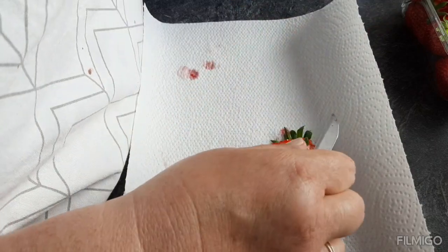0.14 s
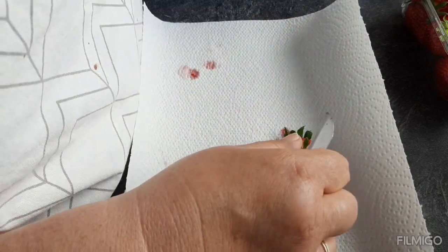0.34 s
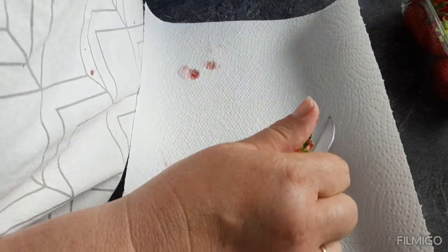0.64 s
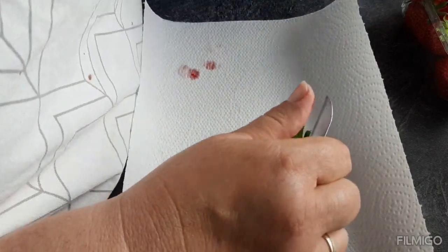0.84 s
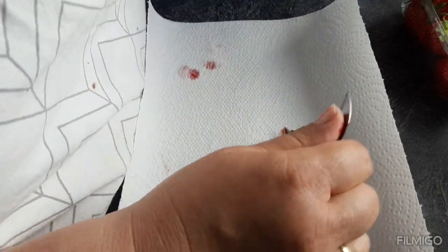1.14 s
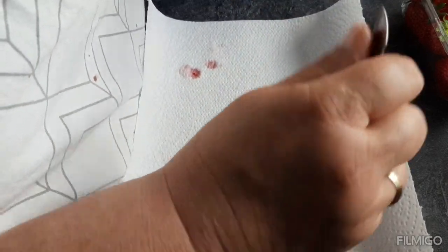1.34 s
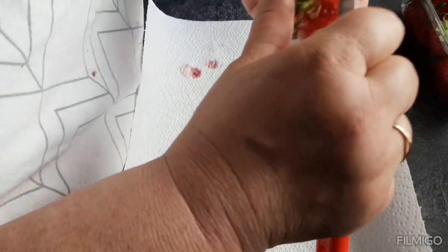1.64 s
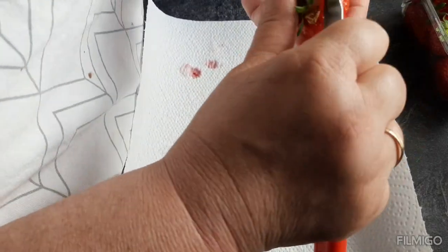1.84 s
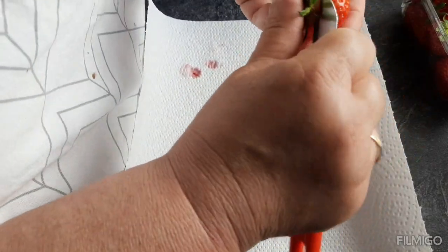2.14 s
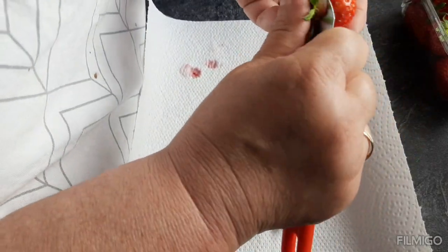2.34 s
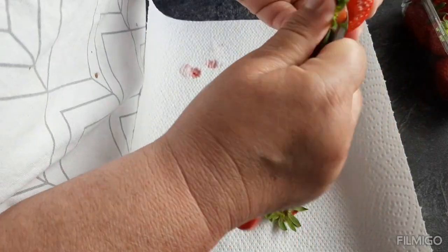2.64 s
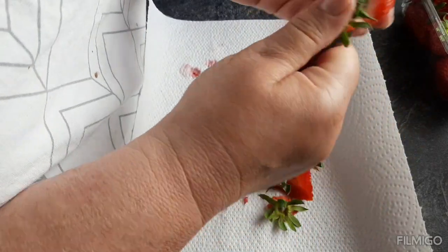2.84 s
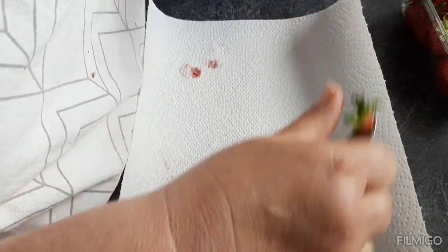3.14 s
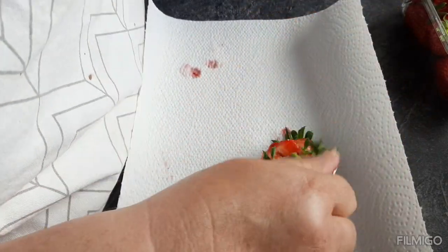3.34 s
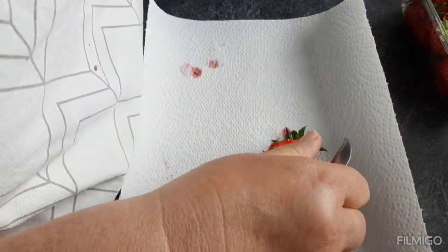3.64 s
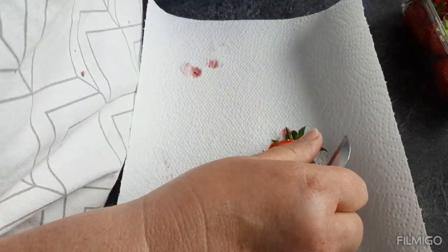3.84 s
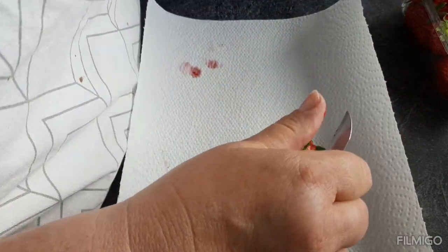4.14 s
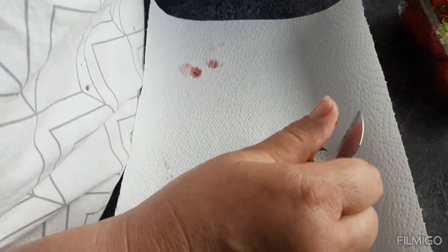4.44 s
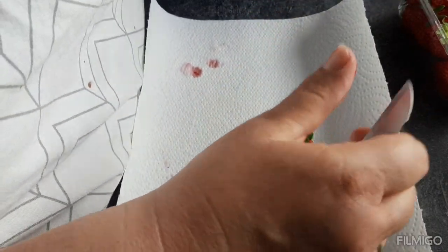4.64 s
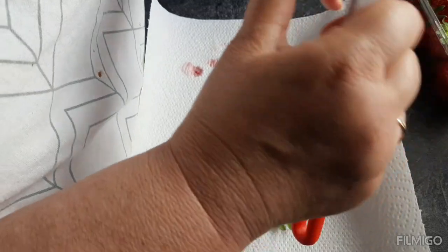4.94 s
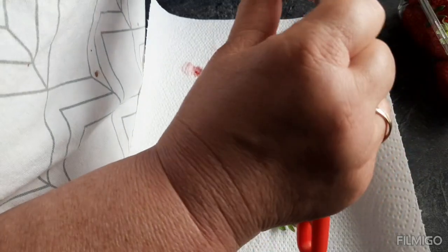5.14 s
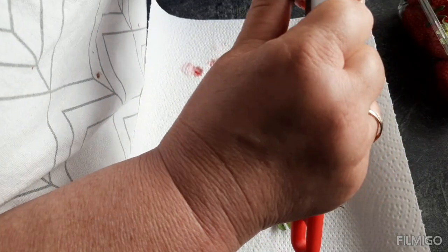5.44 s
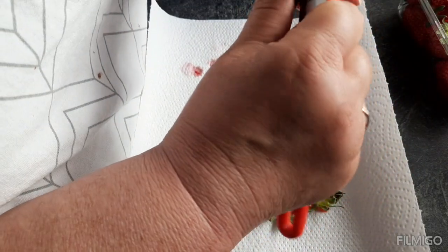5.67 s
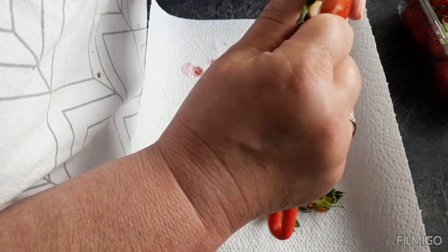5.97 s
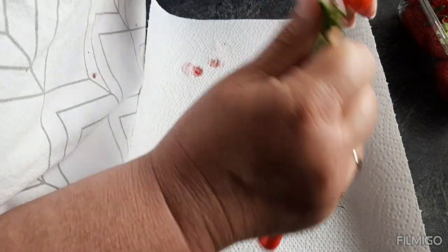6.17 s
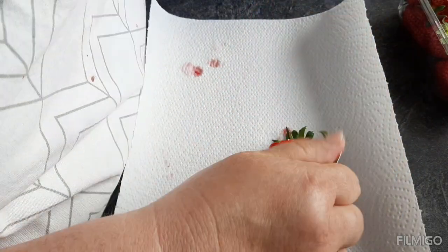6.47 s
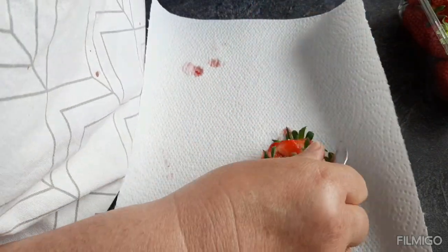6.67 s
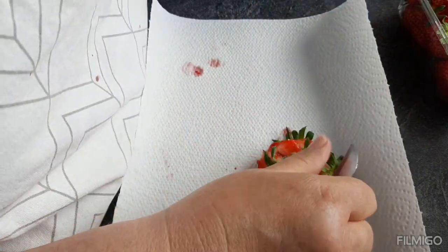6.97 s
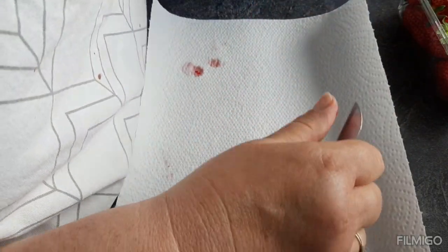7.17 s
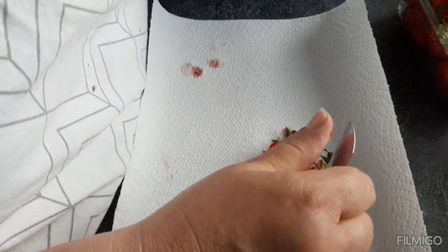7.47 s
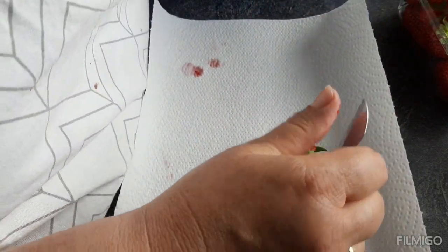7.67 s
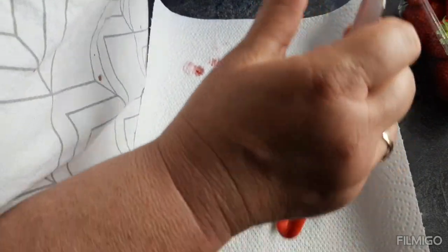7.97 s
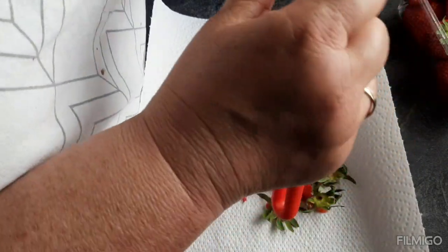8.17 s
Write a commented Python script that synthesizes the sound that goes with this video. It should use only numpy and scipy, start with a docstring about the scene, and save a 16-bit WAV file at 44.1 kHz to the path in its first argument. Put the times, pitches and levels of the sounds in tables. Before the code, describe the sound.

Close kitchen sounds of hulling strawberries: hollow plastic tub knocks, crisp wet cuts, tiny leaf snaps, soft sleeve and paper rustle, low hum.

```python
"""Cutting strawberries in a kitchen

A small knife hulls strawberries close by: noisy grains form crunches, short filtered clicks form snaps.
Berries knock in a thin plastic tub, made of many ringing tones plus a buzz and a crack.
Sleeves, hands and paper rustle as grainy noise; an appliance hums as sines and narrow noise over soft air.
Short feedback delays add the kitchen's echo to the knife, snaps and knocks."""
import sys
import numpy as np
from scipy import signal
from scipy.fft import rfft, irfft, next_fast_len
from scipy.io import wavfile

SR = 44100
rng = np.random.default_rng(int(sys.argv[2]) if len(sys.argv) > 2 else 0)


def to_wav(s):
    """Save 16-bit WAV."""
    ch = np.atleast_2d(s).T  # columns
    pcm = np.round(np.clip(ch, -1, 1) * 32767)  # PCM
    wavfile.write(sys.argv[1], SR, pcm.astype(np.int16))


N = 366468      # length in samples
SIDES = np.array([[1], [-1]])      # plus for left, minus for right

# Bites of blade and fingertips into the fruit; the wet crunch is relative to the dry one:
# start_s, swell_s, hold_s, crunch_db, wet_db
BITES = [(1.978, 0.065, 0.12, -56.5, -9.5), (2.199, 0.0081, 0.027, -53, 0.5),
         (2.241, 0.021, 0.0091, -43.5, -2), (2.277, 0.0047, 0.0069, -38, -2.5),
         (2.314, 0.014, 0.0081, -42.5, -5), (2.37, 0.02, 0.13, -55, -26), (2.532, .025, .02, -49.5, -19),
         (2.633, 0.022, .01, -44.5, -11.5), (2.67, 0.009, .03, -51.5, -24),
         (2.749, 0.058, .008, -48.5, -12), (4.204, .008, .008, -56, 13.5), (4.233, 0.02, 0.023, -57, 4),
         (4.348, 0.037, .015, -49, -1), (4.736, 0.032, .03, -62.5, 6.5), (5.251, 0.018, 0.032, -52, -19),
         (5.349, 0.047, 0.026, -50, -12), (5.546, 0.0073, 0.076, -45.5, -3.5),
         (5.614, 0.038, 0.052, -44, -12.5), (5.74, 0.037, 0.043, -49, -14),
         (5.841, 0.029, 0.019, -39.5, -15.5), (5.887, 0.014, 0.03, -47, -10),
         (6.038, 0.042, 0.014, -52.5, -7.5)]
SWELL_DB, FADE_DB_PER_S = 13.5, 261      # each bite swells by this much, holds, then fades
# Colour of the dry crunch: pitch_hz, level_db (per Hz)
CRUNCH_COLOUR = [(1470, -34), (2500, -70), (4020, -3.5), (4650, 2.5), (5100, -0.5), (5500, -3), (7710, 6.5),
                 (9550, -1), (12100, 6), (15600, 3)]
# Fibres and leaves that snap: start_s, peak_db, pitch_hz
SNAPS = [(1.015, -39, 12800), (2.0023, -46, 11000), (2.205, -33.5, 8400), (2.213, -37, 8140),
         (2.2204, -35, 11500), (2.2294, -42, 8700), (2.24, -35, 13100), (2.256, -30.5, 8040),
         (2.2685, -36, 6710), (2.2848, -20.5, 11800), (2.338, -27, 13100), (2.404, -37, 11200),
         (2.4434, -43, 11600), (2.5441, -39, 9770), (2.5611, -32, 9900), (2.5735, -30, 9910),
         (2.597, -43, 7850), (2.6508, -40, 7480), (2.6597, -30, 12000), (2.6674, -39, 11300),
         (5.2654, -43, 12500), (5.5565, -38, 8250), (5.855, -29, 7800), (5.876, -39, 7880),
         (5.888, -29.5, 7500), (5.9748, -51, 6800), (6.081, -38, 8500), (6.365, -31, 8110),
         (6.6724, -38, 8350), (6.6774, -48, 8360)]
SNAP_PAN_DB = 2.2      # left minus right

# Knocks on the tub; ring_share scales the free ring time, pan is left minus right:
# start_s, level_db, bass_db, bass_hz, wall_db, wall_hz, crack_db, contact_ms, ring_share (ratio), pan_db
KNOCKS = [(0.326, -47.5, 11, 131.5, 1.5, 1890, -26, 8, 0.92, 1),
          (0.43, -14.5, -12, 374, -10, 1900, -26.5, 9, 0.9, 3),
          (0.444, -17.5, -1.5, 202, -3, 1920, -31, 7.4, 0.57, -1.5),
          (0.515, -28.5, 5.5, 111, 0.5, 2020, -12.5, 16, .7, 0),
          (0.621, -40, 10.5, 141, 3.5, 1250, -12, 20, 0.67, -1),
          (0.87, -49.5, 15.5, 145, 0.5, 1930, -9, 10, 1.0, 1.5),
          (1.912, -48, -5, 170, -27, 1250, -29, 7.5, .6, 9),
          (3.623, -18.5, -18, 110, -6.5, 1990, -21.5, 23, 0.73, 2),
          (3.672, -15.5, 0.5, 156, 2, 2030, -27, 4.9, 0.8, 0.5),
          (3.687, -12.5, 0.5, 174, 1, 2800, -13, 5, 0.92, -0.5),
          (3.699, -10.5, -1, 177, 1.5, 1890, -23, 6.9, 0.66, 1),
          (3.753, -39.5, 7, 180, 7.5, 1320, -22, 11, .65, -7),
          (3.789, -11, -7, 331, -9, 1440, -35, 5, 0.34, 2),
          (3.88, -20.5, -7.5, 150, -8, 1330, -55, 3.3, 0.68, 1),
          (3.927, -33, 0, 129, -8, 1910, -13, 14, 1.3, 3),
          (3.947, -24.5, -0.5, 185, -6.5, 1880, -19.5, 10, 0.76, -1.5),
          (4.213, -35.5, 4, 239, -3.5, 1350, -10, 10, 0.67, 2),
          (6.351, -38.5, 1, 330, -20, 1290, -7, 7.9, 1.3, 10),
          (6.375, -30.5, -15, 301, -6, 1470, -12, 6.8, 0.41, 4),
          (6.675, -50.5, 10, 258, 6, 2460, 5.5, 11, 0.41, -0.5),
          (6.916, -47, 14.5, 110, -5, 1970, -16, 11, 0.88, 0),
          (6.944, -27, 9.5, 111, -13, 1700, -26, 12, 0.55, 3),
          (6.952, -24.5, 4.5, 201, -6.5, 2150, -26, 22, 0.96, -0.5),
          (7.08, -40.5, -2.5, 256, -2, 2480, -12, 6.6, 0.98, -0.5),
          (7.142, -54.5, 10, 120, 8.5, 2680, 1, 9, 0.91, -1),
          (7.56, -44.5, -11, 258, 5, 1370, -6, 25, .6, -5)]
# Ringing tones of the tub; t60 is the time to fall by 60 dB when free: pitch_hz, level_db, t60_s
TUB_TONES = [(114.6, -4.5, 0.2), (158.7, 3.5, 0.12), (221.8, -7, 0.34), (306, -0.5, 0.052),
             (337.5, 2, 0.075), (396.5, -2.5, 0.06), (470.3, -4, 0.11), (498.2, -6, 0.15),
             (620.5, -7.5, 0.11), (683, -9.5, 0.032), (907, -7, 0.17), (1257, -24, 0.24),
             (1324.4, -5.5, 0.17), (1396, -9, 0.1), (1830, -2.5, 0.036), (1906, -18.5, 0.18),
             (1912, -10, 0.14), (2306, -6.5, 0.056), (2386, -13.5, 0.36), (2567, -13, 0.21),
             (3015, -14.5, 0.24), (3340, -12, 0.18), (3485, -12, 0.061), (4250, -22, .06), (4570, -35, .06),
             (5200, -4, 0.069)]
BASS_BELOW_HZ, WALL_ABOVE_HZ = 400, 1000
LONGEST_CYCLES = 300      # cap on a tone's 60 dB ring time, in cycles
FAR_PANEL_HZ, FAR_PANEL_SLOPE = 913.4, 0.47      # a tone that favours hard blows: extra dB per dB of blow

# Echo: time to fall by 60 dB at low pitch, where the walls start to dull it, and its level
KITCHEN_T60_S, WALL_CUT_HZ, KITCHEN_DB = 0.23, 2400, -16

# Hands, sleeves and paper over time: start_s, hiss_db, rub_db, thud_db
RUSTLE = [(0.0, -64, -61, -66), (0.25, -61.5, -57, -61.5), (0.7, -60.5, -59, -52), (0.99, -56, -54.5, -60),
          (1.18, -62, -64.5, -56), (1.39, -52, -54.5, -55), (1.69, -69.5, -68, -61.5),
          (2.2, -73, -68.5, -62.5), (2.5, -65, -59.5, -49.5), (2.9, -66.5, -69.5, -60.5),
          (3.15, -52.5, -52, -51.5), (3.4, -61.5, -63.5, -62.5), (4.03, -62.5, -61, -70),
          (4.28, -57, -55, -49), (4.5, -66, -61, -53.5), (4.75, -57, -59.5, -52), (5.08, -67.5, -66.5, -64),
          (5.3, -68.5, -65.5, -55), (5.75, -54.5, -62.5, -55.5), (6.1, -68, -74.5, -62),
          (6.36, -55, -57, -57), (6.75, -71, -64, -53.5), (7.15, -65.5, -62.5, -59.5),
          (7.57, -56.5, -55, -48), (7.7, -63, -60.5, -52), (7.91, -58.5, -66, -54),
          (8.31, -71.5, -70.5, -61)]
# Colour of the rustling hiss: pitch_hz, level_db (per Hz)
HISS_COLOUR = [(1470, -42.5), (2500, -15.5), (2920, -12.5), (3460, -7), (7950, -2), (9720, -8),
               (11300, -6.5), (13400, -7.5), (15800, -7)]
# After a knock the berries shift and settle
SETTLE_S, SETTLE_RUB_DB, SETTLE_THUD_DB = 0.04, -24.5, -20

MOTOR_HZ, MOTOR_DB = 48.2, -48      # appliance tone, peak level before its slow drift
# Narrow wavering tones of the appliance: pitch_hz, width_hz, level_db
HUM = [(518, 3.7, -71.5), (1196, 120, -68), (1732, 21, -75), (1932, 50, -81)]
# Tones that throb as two near pitches beat; level is that of the stronger pitch, before swell and drift,
# and partner_share is the weaker one's height:
# pitch_hz, level_db, beats_per_s, loudest_s, partner_share (0-1)
THROBS = [(97.3, -55.5, 1.997, 4.18, 0.83), (180.3, -56.5, 2.41, 5.12, 0.68), (256.3, -60.5, 2.2, 5.27, 1),
          (271, -63, 1.6, 4.3, 0.6)]
# Slow swell of the two middle throbbing tones about their level: start_s, lower_db, upper_db
THROB_SWELLS = [(0.0, -11, 0.5), (1.5, -12, -0.5), (2.0, -12, -13), (2.6, 3.5, -2), (3.4, 5, -2),
                (5.1, 4, 2.5), (6.1, 0.5, -7.5), (6.6, -5, 10.5), (7.3, -2, 4.5), (8.31, -4, 4)]
# Colour of the air noise: pitch_hz, level_db (per Hz)
AIR_COLOUR = [(18, -30.5), (30, -9), (103, -5), (127, -6.5), (183, -1.5), (232, -27.5), (271, -5.5),
              (301, -25), (362, -14), (698, -47.5), (1790, -26), (2100, -60), (4150, -51), (5120, -58.5),
              (15800, -38.5)]
AIR_DB = -53      # before its slow drift

# How alike left and right are: pitch_hz, likeness (0-1)
LIKENESS = [(50, 0.75), (250, 0.85), (600, 0.1), (3000, 0.042), (8000, 0.91), (14000, .35)]
# How much louder the left is than the right: pitch_hz, lean_db
LEAN = [(50, 7), (150, -0.5), (400, 7.5), (2000, 1.5), (6000, 0.5), (14000, 5)]
CUTOFF_HZ = 15950      # top of the sound


def from_db(db):
    """Turn decibels into a gain."""
    return 10 ** (np.asarray(db) / 20)


def rms_one(x):
    """Scale to an average power of 1."""
    return x / np.sqrt(np.mean(x ** 2) + 1e-20)


def in_time(rows):
    """Read each column of a timed table at every sample."""
    times, *columns = np.transpose(rows)
    return [np.interp(np.arange(N) / SR, times, column) for column in columns]


def at_hz(points, hz):
    """Read a table by pitch, on a log scale as ears hear it."""
    points = np.array(points)
    return np.interp(np.log(np.maximum(hz, 1)), np.log(points[:, 0]), points[:, 1])


def drift(rate):
    """Wander slowly at random with spread 1; a higher rate (Hz) wanders faster."""
    step = 40      # samples between the points worked out
    r = np.exp(-2 * np.pi * rate * step / SR)
    noise = rng.standard_normal(N // step + 2002)
    slow = signal.lfilter([1], [1, -2 * r, r * r], noise)[2000:]      # drop the run-in
    return np.interp(np.arange(N) / step, np.arange(len(slow)), rms_one(slow))


def band(x, low_hz, high_hz):
    """Keep the pitches between two limits."""
    return signal.sosfilt(signal.butter(2, [low_hz, high_hz], "band", fs=SR, output="sos"), x)


def ring(x, hz, t60):
    """Ring like a struck object: a unit click starts a fading sine of height 1."""
    r = from_db(-60 / (t60 * SR))
    turn = 2 * np.pi * hz / SR
    return signal.lfilter([0, np.sin(turn)], [1, -2 * r * np.cos(turn), r * r], x + 1e-18)


def coloured(pair, spectrum):
    """Blend two unrelated signals into a stereo sound with this spectrum and power 1."""
    size = next_fast_len(N)
    hz = np.fft.rfftfreq(size, 1 / SR)
    mid, side = rfft(pair, size)
    alike = at_hz(LIKENESS, hz)
    stereo = np.sqrt(1 + alike) * mid + np.sqrt(1 - alike) * side * SIDES
    stereo = stereo * from_db(at_hz(spectrum, hz) + at_hz(LEAN, hz) / 2 * SIDES)
    return rms_one(irfft(stereo, size)[:, :N])


def gritty(per_s, spread_db, smooth):
    """Scatter noise grains of uneven size over a share of smooth noise."""
    sizes = from_db(spread_db * np.minimum(rng.exponential(1, N), 4))
    grains = sizes * (rng.random(N) < per_s / SR)
    grains = signal.lfilter([1], [1, -.9], grains)      # each lasts a fraction of a millisecond
    return (rms_one(grains) + smooth) * rng.standard_normal((2, N))


def wavering(hz, width_hz):
    """Pass noise twice through a narrow resonance: a wavering tone, nearly alike on both sides."""
    t60 = np.log(1000) / (np.pi * width_hz)
    noise = rng.standard_normal((2, N + SR))
    tone = ring(ring(noise, hz, t60), hz, t60)[:, SR:]      # drop a second of run-in
    mid, side = rms_one(tone)
    return (mid + 0.23 * side * SIDES) * from_db(at_hz(LEAN, hz) / 2 * SIDES)


def knife():
    """Cells burst in dense clicks under the blade; juicy flesh adds a lower crunch."""
    grains = gritty(700, 2.5, smooth=1.5) * from_db(1.8 * drift(70))
    crunch = coloured(grains, CRUNCH_COLOUR)
    lower = signal.sosfilt(signal.butter(1, 6500, fs=SR, output="sos"), crunch)
    tilt = from_db(1.8 * drift(8))      # the balance of low and high crunch wanders gently at random
    dry_crunch = rms_one(lower * tilt + (crunch - lower) / tilt)
    wet_crunch = coloured(grains, [(500, -21), (1000, 0.5), (2000, -2.5), (3500, -4.0), (6000, -16), (9000, -52)])
    t = np.arange(N) / SR
    dry_power, wet_power = 0, 0
    for start, swell, hold, crunch_db, wet_db in BITES:
        rise_db = SWELL_DB * np.minimum((t - start) / swell - 1, 0)
        fade_db = FADE_DB_PER_S * np.maximum(t - start - swell - hold, 0)
        power = (t > start) * from_db(crunch_db + rise_db - fade_db) ** 2
        dry_power = dry_power + power
        wet_power = wet_power + power * from_db(wet_db) ** 2
    return np.sqrt(dry_power) * dry_crunch + np.sqrt(wet_power) * wet_crunch


def snaps():
    """Snap fibres and leaves: each is a broad click of a millisecond or two, centred near its pitch."""
    size = 900
    out, t = np.zeros((2, N + size)), np.arange(size) / SR
    fade = np.exp(-t / .0009) + .15 * np.exp(-t / .004)
    for start, peak_db, hz in SNAPS:
        mid, side = rng.standard_normal((2, size))
        burst = (mid + .6 * side * SIDES) * fade
        click = band(burst, hz * .65, hz * 1.3) + .3 * band(burst, 1500, 14000)
        click = click / np.abs(click.mean(axis=0)).max()
        at = round(start * SR)
        out[:, at:at + size] += click * from_db(peak_db + SNAP_PAN_DB / 2 * SIDES)
    return out[:, :N]


def knocks():
    """A soft berry strikes, then rattles on the wall for some ms; the loose wall rings, buzzes and cracks."""
    size = round(.4 * SR)
    out, t = np.zeros((2, N + size)), np.arange(size) / SR
    for (start, blow_db, bass_db, bass_hz, wall_db, wall_hz, crack_db,
         contact_ms, ring_share, pan_db) in KNOCKS:
        contact = np.exp(-t / (contact_ms / 1000))
        body = np.zeros((2, size))
        for hz, level_db, t60 in TUB_TONES:
            push = rng.standard_normal((2, size)) * (contact + 0.24 * np.exp(-t / 0.041))
            push[0, 0] = 7.3      # the first touch is a firm step
            push = push / np.sqrt(np.sum(push[0] ** 2))
            ring_s = min(t60 * ring_share, LONGEST_CYCLES / hz)      # plastic soon damps fast motion
            mid, side = ring(push, hz, ring_s)
            level_db += rng.normal(0, 2.1)      # no two blows drive the tones alike
            if hz < BASS_BELOW_HZ:      # where the blow lands picks the low tones, nearly alike on both sides
                level_db += bass_db - 12.4 * np.log2(hz / bass_hz) ** 2
                side = 0.1 * side
            elif abs(hz / FAR_PANEL_HZ - 1) < .1:
                level_db += FAR_PANEL_SLOPE * blow_db
            elif hz > WALL_ABOVE_HZ:
                level_db += wall_db - 14.8 * np.log2(hz / wall_hz) ** 2
            body += from_db(level_db) * (mid + 0.72 * side * SIDES)
        buzz_noise, crack_noise = rng.standard_normal((2, 2, size))
        buzz = band(buzz_noise * contact, 0.22 * wall_hz, 1.35 * wall_hz)
        crack = band(crack_noise * (contact + 0.79 * np.exp(-t / 0.038)), 2300, 9300)
        hit = body + from_db(wall_db - 5.0) * buzz + from_db(crack_db) * crack
        at = round(start * SR)
        out[:, at:at + size] += from_db(blow_db + pan_db / 2 * SIDES) * hit
    return out[:, :N]


def kitchen(x):
    """Echo between walls: six feedback delays a side, duller on every round."""
    out, dull = np.zeros((2, N)), np.exp(-2 * np.pi * WALL_CUT_HZ / SR)
    size = next_fast_len(N + SR)
    one_sample = np.exp(-2j * np.pi * np.fft.rfftfreq(size))      # delay by one sample
    spectrum = rfft(x, size)
    lags = (rng.uniform(.010, .035, 12) * SR).astype(int)
    for k, lag in enumerate(lags):
        loss = from_db(-60 * lag / SR / KITCHEN_T60_S)
        dulling = (1 - dull) / (1 - dull * one_sample)
        loop = loss * dulling * one_sample ** lag
        echoes = irfft(spectrum * loop / (1 - loop), size)[:N]
        out[k % 2] += echoes * (-1) ** (k // 2)
    return out


def settling():
    """Berries shift after each knock: a strength that jumps with the blow and dies away."""
    blows = np.zeros(N)
    for start, blow_db, *_ in KNOCKS:
        blows[round(start * SR)] = from_db(blow_db)
    return signal.lfilter([1], [1, -np.exp(-1 / (SETTLE_S * SR))], blows + 1e-18)


def rustle():
    """Cloth and paper hiss; skin rubs duller; the counter carries the lowest part."""
    hiss_db, rub_db, thud_db = in_time(RUSTLE)
    after_knock = settling()
    hiss = coloured(gritty(2500, 2.3, smooth=2.8), HISS_COLOUR)
    rub = coloured(gritty(1100, 1.8, smooth=3.7),
                   [(500, -8.5), (800, 1.5), (2200, -2), (4000, -15), (7000, -28.5)])
    thud = coloured(rng.standard_normal((2, N)),
                    [(70, -41.0), (120, -5.5), (300, 2.5), (650, -4), (1000, -22), (2000, -71.5)])
    hiss_gain = from_db(hiss_db + 0.46 * drift(12))
    rub_gain = from_db(rub_db + 0.6 * drift(20)) + from_db(SETTLE_RUB_DB) * after_knock
    thud_gain = from_db(thud_db + 2.1 * drift(17.7)) + from_db(SETTLE_THUD_DB) * after_knock
    return hiss * hiss_gain + rub * rub_gain + thud * thud_gain


def room_tone():
    """Air noise, a motor sine of drifting level, looser tones of narrow noise, and beating tones."""
    t = np.arange(N) / SR
    motor = np.sin(2 * np.pi * MOTOR_HZ * t) * from_db(MOTOR_DB + 1.4 * drift(2.5) + 0.96 * SIDES)
    air = from_db(AIR_DB + 2.2 * drift(5)) * coloured(rng.standard_normal((2, N)), AIR_COLOUR)
    out = motor + air
    for hz, width_hz, level_db in HUM:
        out += from_db(level_db) * wavering(hz, width_hz)
    swells_db = [0, *in_time(THROB_SWELLS), 0]      # the outer two tones have no swell
    for (hz, level_db, beats, loudest, share), swell_db in zip(THROBS, swells_db):
        beating = 1 + share * np.exp(2j * np.pi * beats * (t - loudest))
        tone = (np.exp(2j * np.pi * hz * t) * beating).real
        out += tone * from_db(level_db + swell_db + 2.07 * drift(4.3) + at_hz(LEAN, hz) / 2 * SIDES)
    return out


def scene():
    """Mix the near sounds and their echo with the rustling and the room tone."""
    near = knife() + snaps() + knocks()
    echo = from_db(KITCHEN_DB) * kitchen(near.mean(axis=0))
    return near + echo + rustle() + room_tone()


def record(dry):
    """Cut the deepest bass below 40 Hz, and end the sound steeply just under 16 kHz."""
    low_cut = signal.sosfilt(signal.butter(4, 40., "high", fs=SR, output="sos"), dry)
    return signal.sosfilt(signal.ellip(12, .5, 60, CUTOFF_HZ, fs=SR, output="sos"), low_cut)


dry = scene()
out = record(dry)
to_wav(out)
```